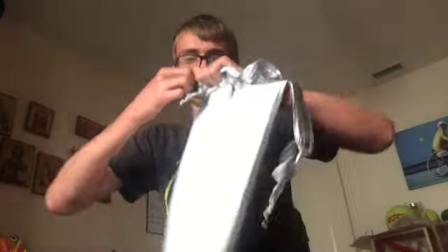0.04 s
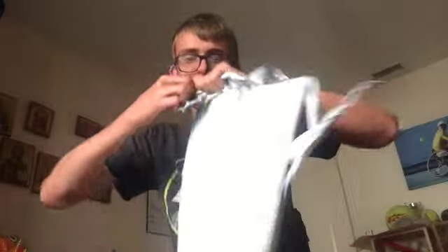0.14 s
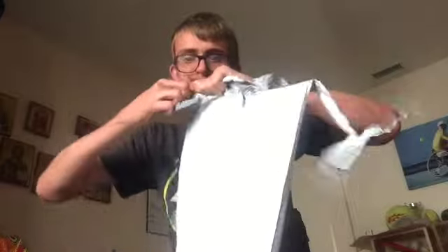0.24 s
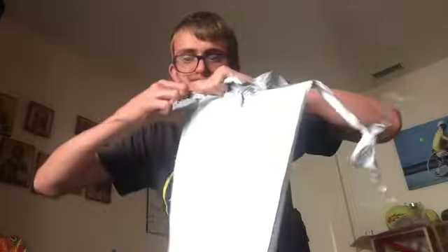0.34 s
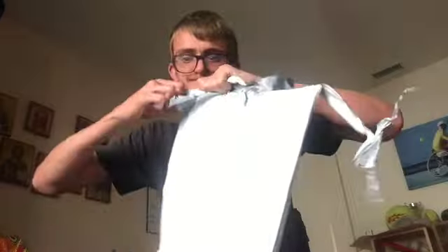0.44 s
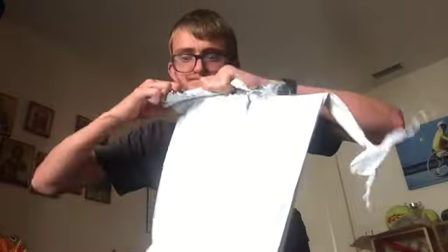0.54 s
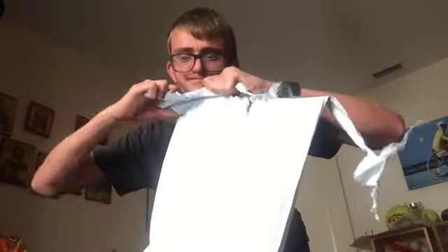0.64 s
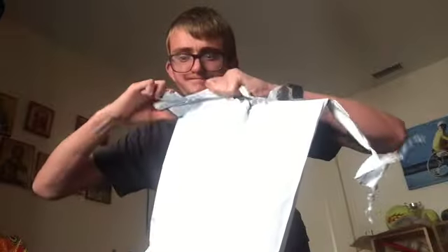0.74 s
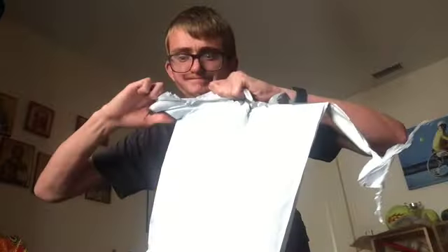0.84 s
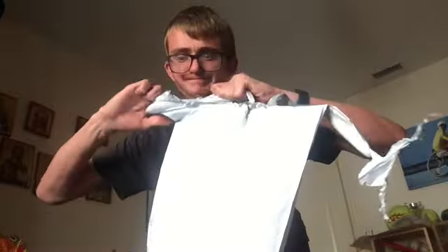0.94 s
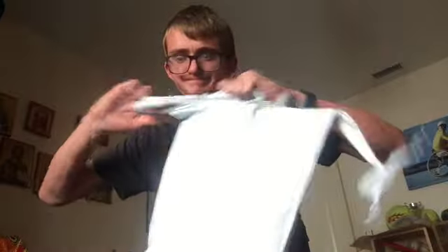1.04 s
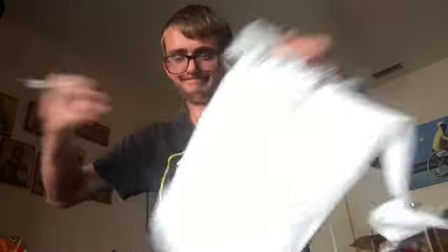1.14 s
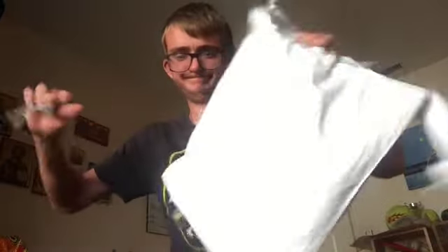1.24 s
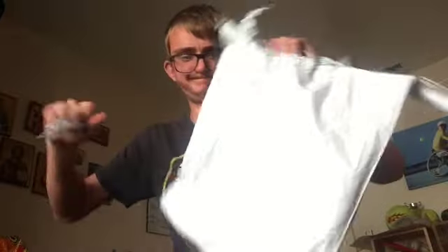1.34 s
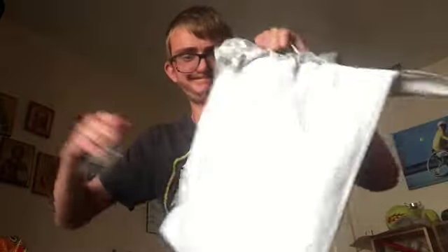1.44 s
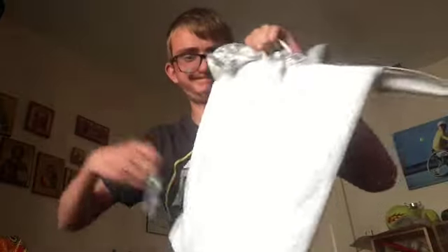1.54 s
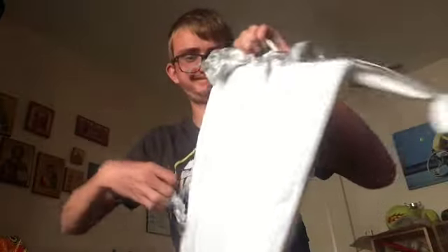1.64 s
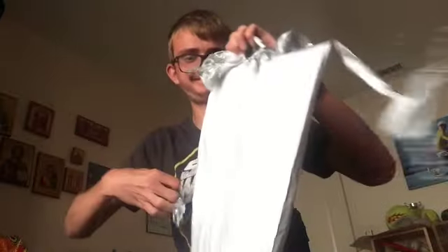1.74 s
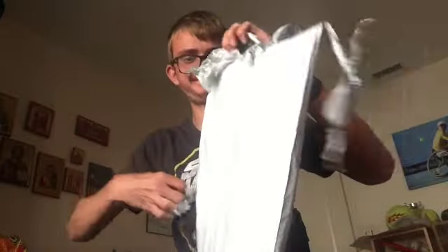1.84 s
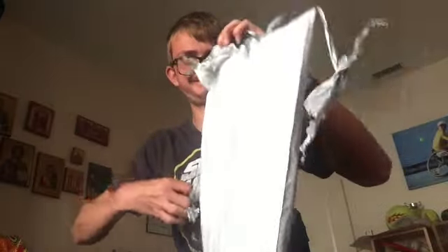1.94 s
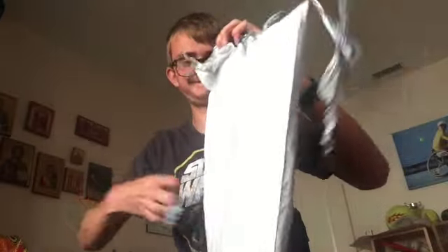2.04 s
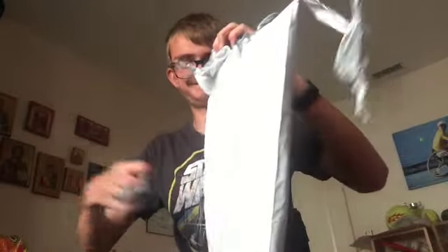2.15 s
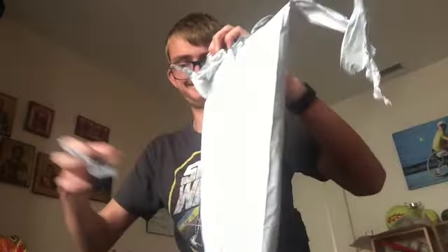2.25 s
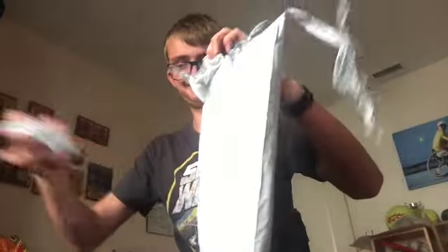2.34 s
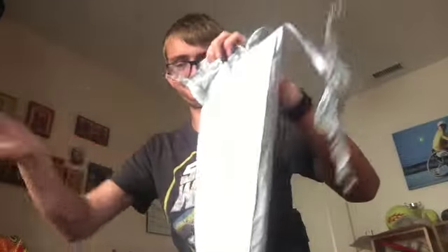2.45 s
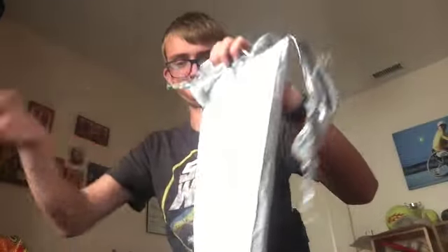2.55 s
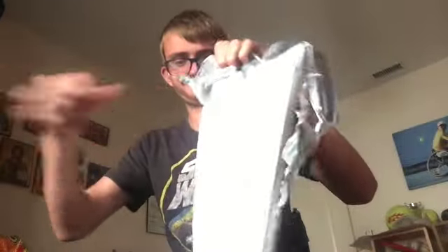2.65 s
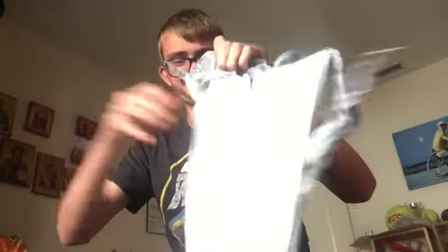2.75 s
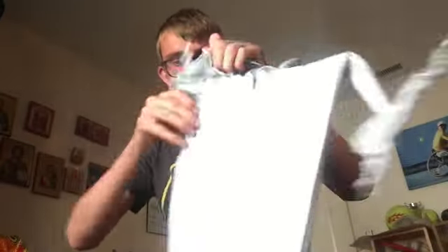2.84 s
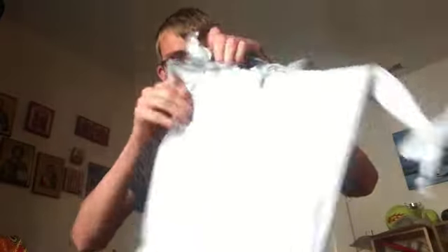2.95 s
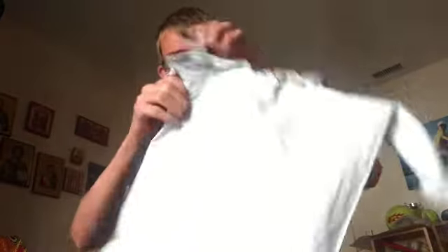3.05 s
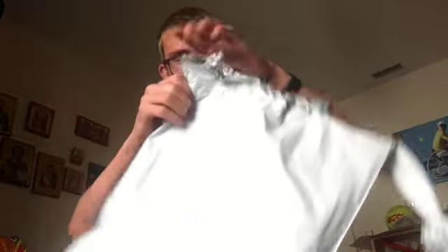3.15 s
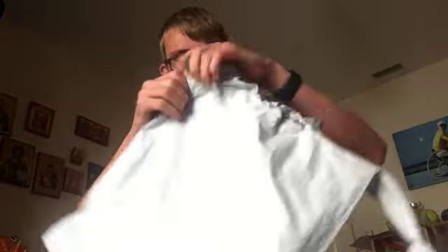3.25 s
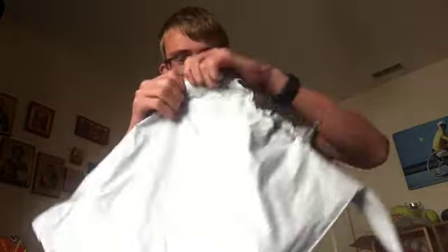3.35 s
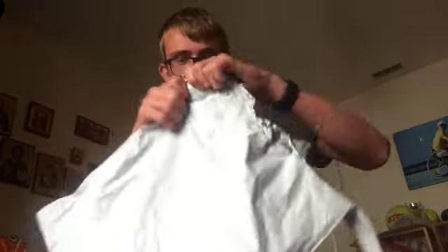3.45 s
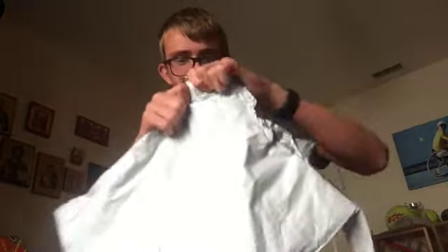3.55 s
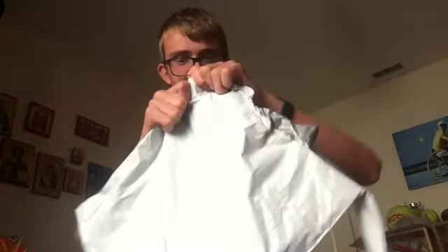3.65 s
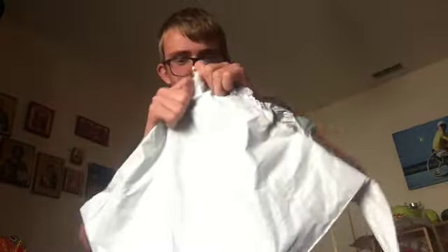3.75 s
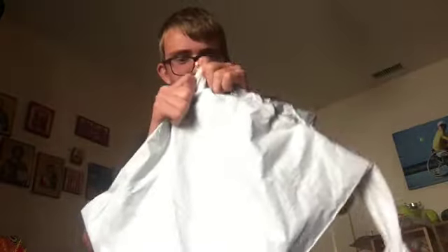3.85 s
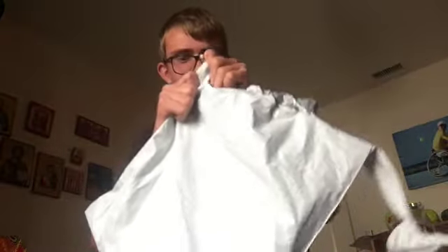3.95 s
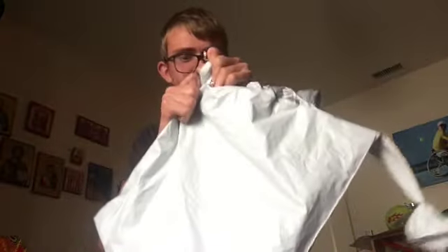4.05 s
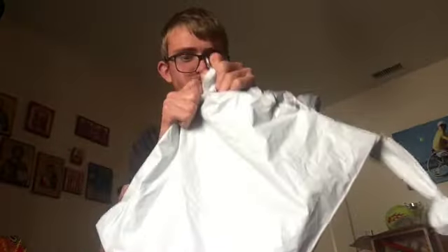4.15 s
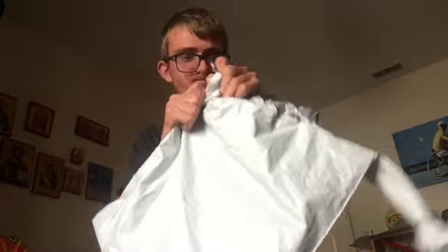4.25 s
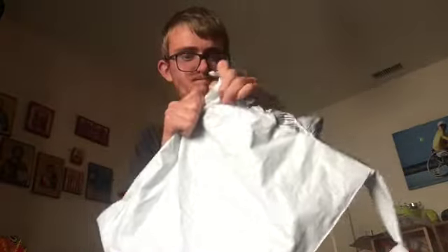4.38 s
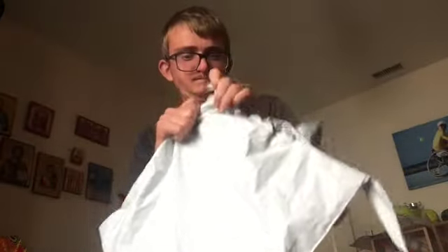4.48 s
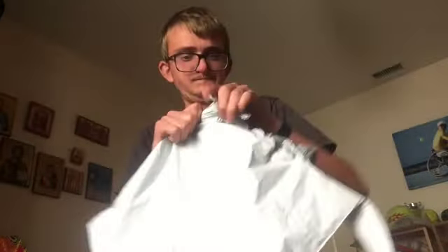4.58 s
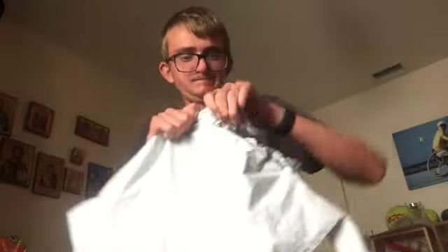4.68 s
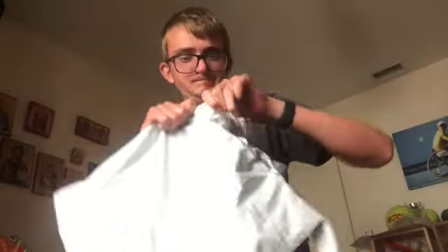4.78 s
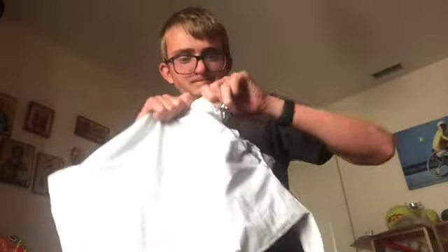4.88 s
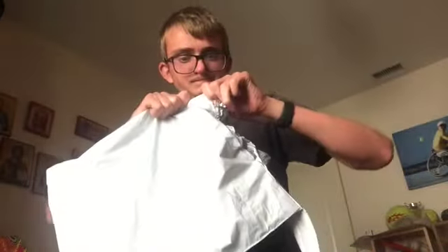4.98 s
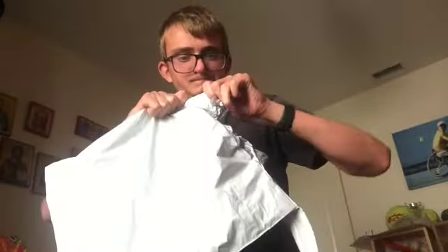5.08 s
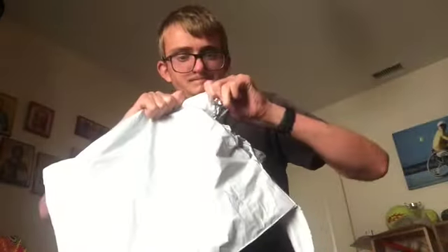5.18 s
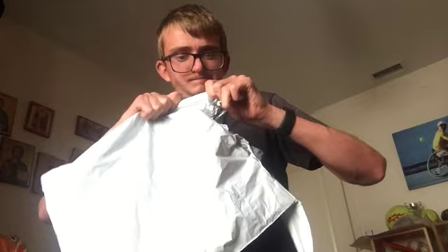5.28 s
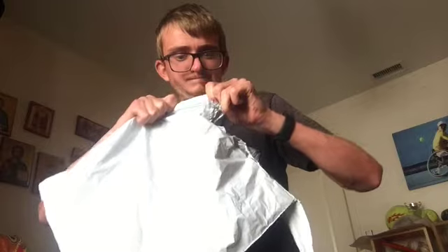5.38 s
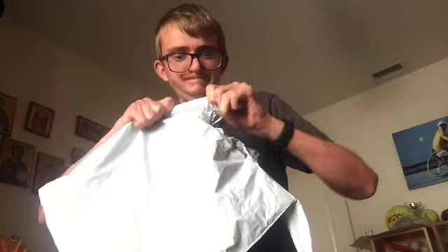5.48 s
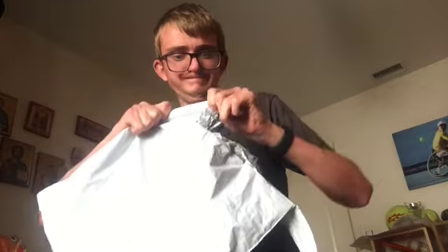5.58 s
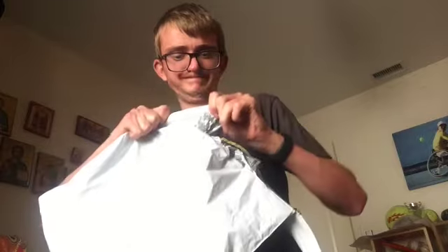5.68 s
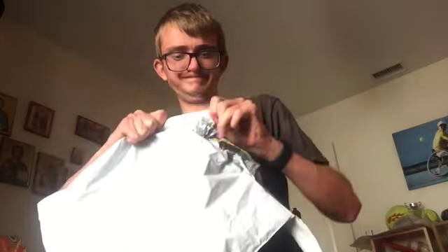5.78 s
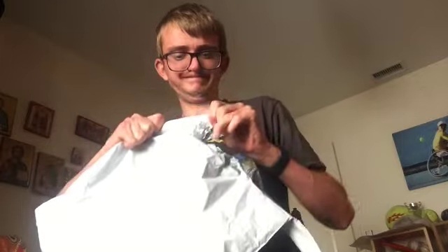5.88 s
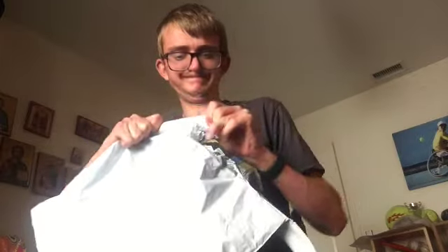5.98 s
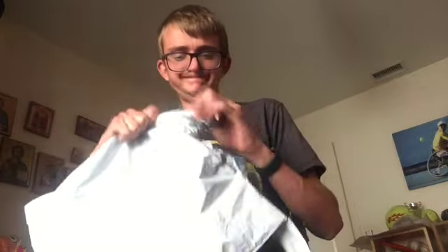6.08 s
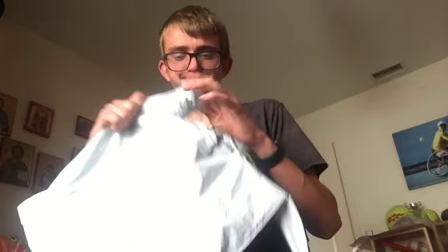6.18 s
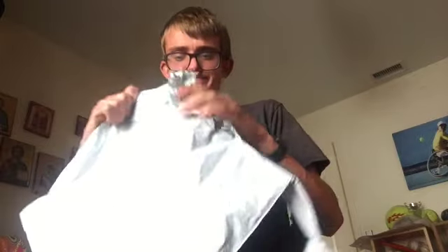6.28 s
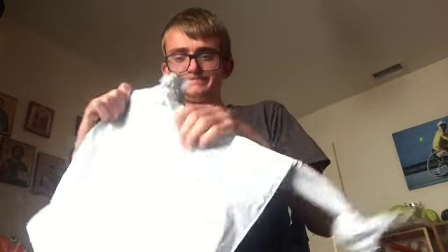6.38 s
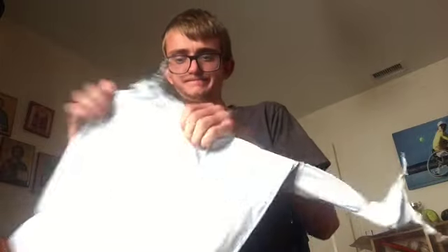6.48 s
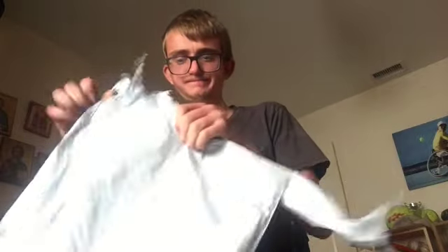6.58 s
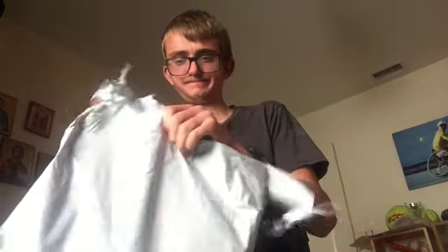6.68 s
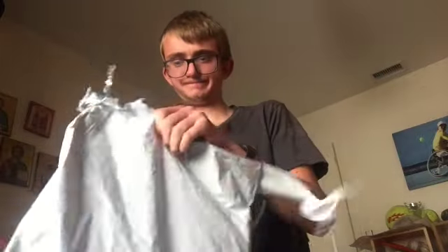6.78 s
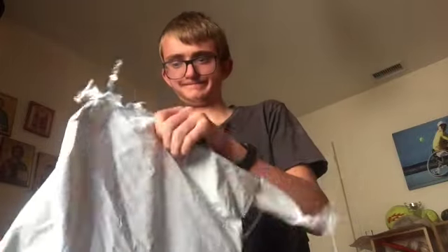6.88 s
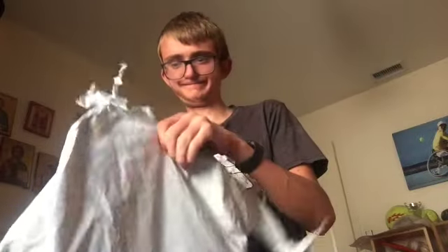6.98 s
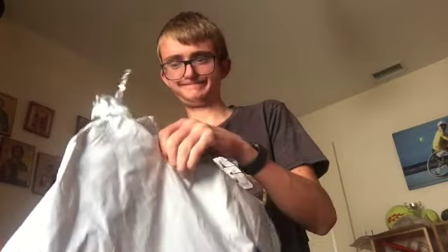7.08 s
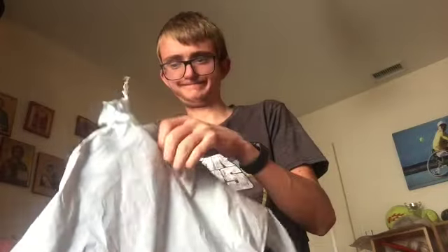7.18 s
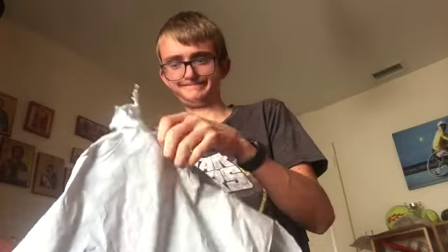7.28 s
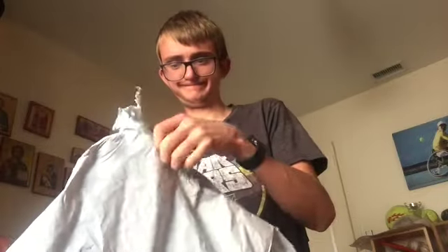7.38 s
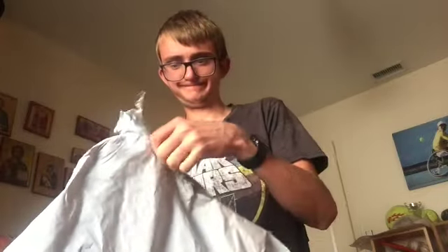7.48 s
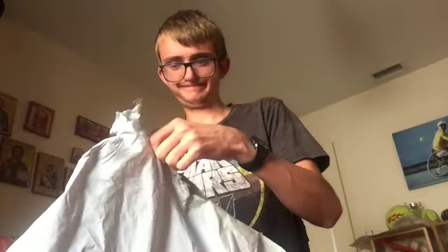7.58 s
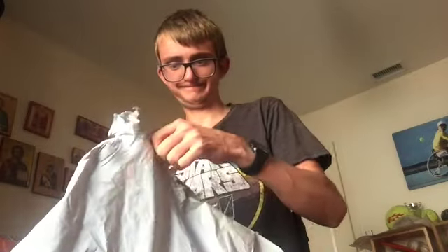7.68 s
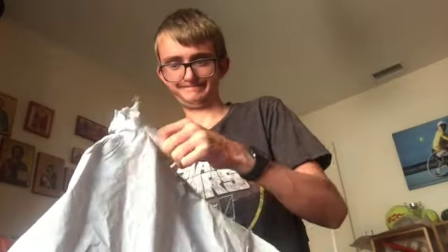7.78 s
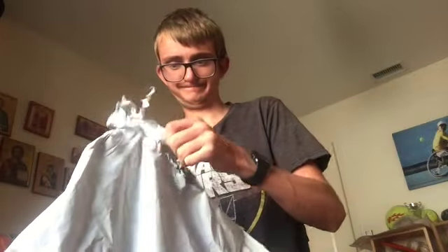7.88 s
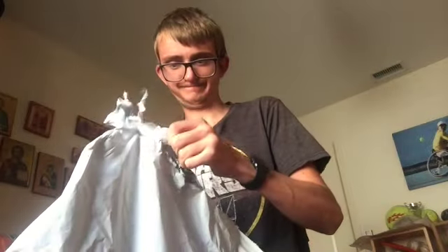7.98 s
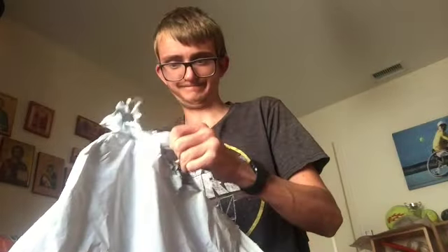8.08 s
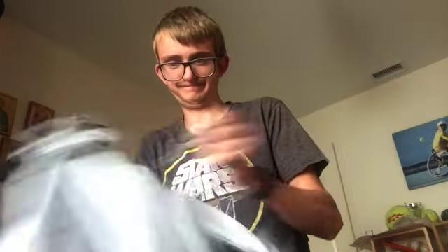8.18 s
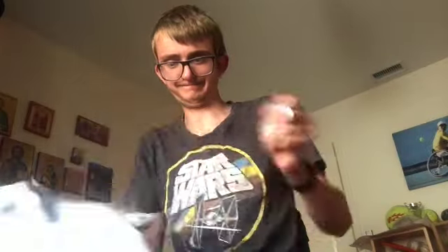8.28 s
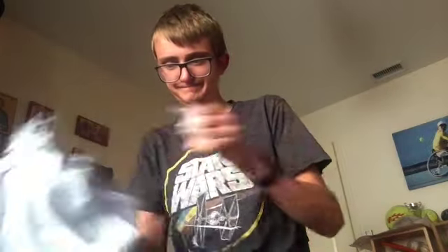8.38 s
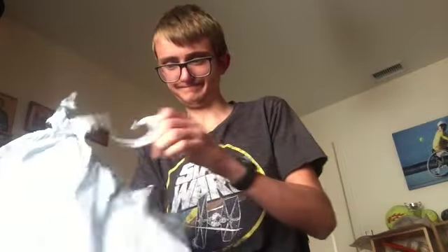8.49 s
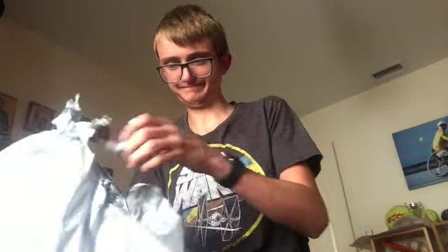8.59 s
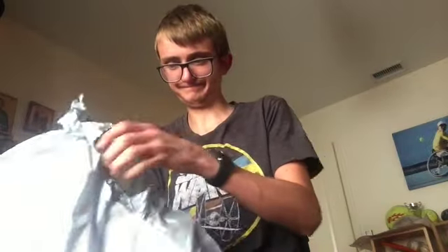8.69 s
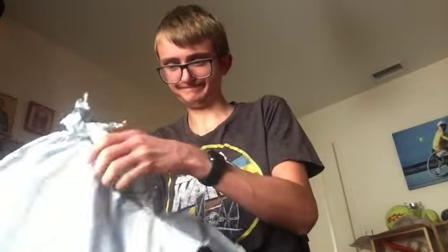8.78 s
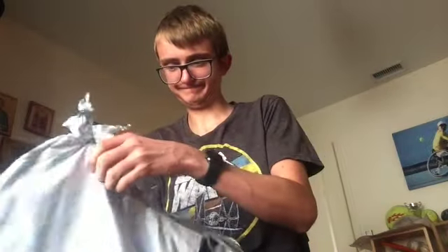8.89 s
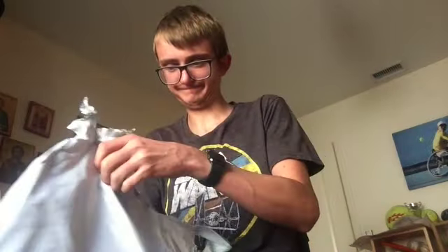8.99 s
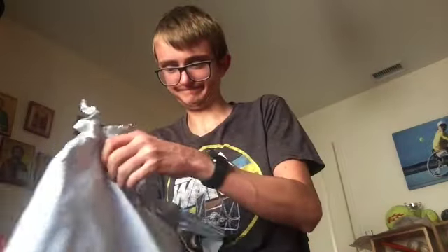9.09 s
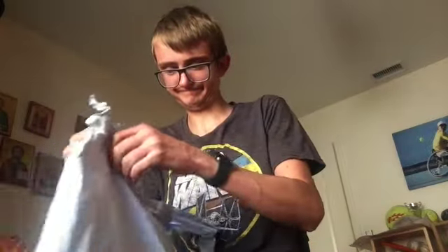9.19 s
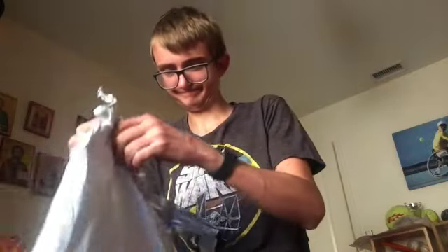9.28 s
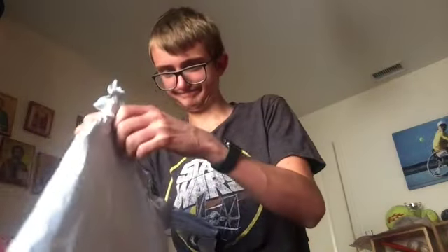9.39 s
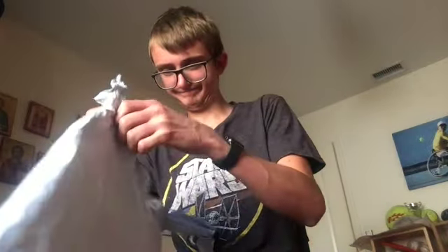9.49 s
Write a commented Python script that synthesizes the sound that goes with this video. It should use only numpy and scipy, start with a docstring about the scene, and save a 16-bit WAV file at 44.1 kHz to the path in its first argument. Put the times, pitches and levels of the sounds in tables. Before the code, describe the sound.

Close, slightly dull-topped pickup of a plastic bag being handled indoors. Light crinkles, one violent crack, then quiet with a few tiny ticks. A busy stretch of rustling and small pops fades into sparse crackles, then a vigorous shake, softer crinkling, a second violent snap with two flapping bursts, and final light ticks over faint room noise.

```python
"""A fine rustle over quiet hiss and rumble comes first, then sharp snaps, as a thin plastic mailing bag
is pulled, torn and shaken by hand in a small furnished room.
Rustle is the summed ringing of many tiny creases plus the hiss of sliding layers; each snap is three
damped tones and a tick of noise, followed by a swarm of smaller creases.
Flaps stir the bass, and the room answers a few milliseconds later by convolution with decaying noise."""
import sys
import numpy as np
from scipy import signal
from scipy.fft import rfft, irfft
from scipy.io import wavfile

SR = 44100
rng = np.random.default_rng(int(sys.argv[2]) if len(sys.argv) > 2 else 0)


def int16_out(signal):
    """Quantize to a 16-bit WAV file."""
    q = np.round(np.clip(np.atleast_2d(signal).T, -1, 1) * 32767)
    wavfile.write(sys.argv[1], SR, q.astype(np.int16))


N = 420273


def from_db(db):
    """Logarithmic level: 20 dB is a factor of ten in amplitude."""
    return 10 ** (np.asarray(db) / 20)


def rms_one(x):
    """Power normalisation: scale to unit rms."""
    return x / np.sqrt(np.mean(x ** 2) + 1e-20)


def at_hz(points, hz):
    """Logarithmic interpolation: read an (f/Hz, value) table along log frequency."""
    table_hz, values = np.transpose(points)
    return np.interp(np.log(hz), np.log(table_hz), values)


def band(x, low_hz, high_hz):
    """Band limitation: Butterworth band-pass along the last axis."""
    edges_hz = [low_hz, min(high_hz, .45 * SR)]
    return signal.sosfilt(signal.butter(2, edges_hz, "band", fs=SR, output="sos"), x)


def coloured(x, spectrum):
    """Spectral shaping: weight a flat sound by a table of spectral density, then set its rms to 1."""
    hz = np.maximum(np.arange(N // 2 + 1) * SR / N, 1)
    return rms_one(irfft(rfft(x) * from_db(at_hz(spectrum, hz)), N))


def drift(rate_hz):
    """Low-passed chance: coarse noise through a double one-pole filter, spread about 1."""
    step = 40   # samples between coarse points
    r = np.exp(-2 * np.pi * rate_hz * step / SR)
    noise = rng.standard_normal(N // step + 2002)
    slow = signal.lfilter([1], [1, -2 * r, r * r], noise)[2000:]   # drop the filter's start
    return np.interp(np.arange(N) / step, np.arange(len(slow)), rms_one(slow))


# Effort of the hands: t/s, level of the creases/dB, treble relative to that level/dB
HANDLING_CURVE = [(0, -66, 2.5), (.11, -55.5, -13), (.2, -64, -29), (.45, -68.5, 0), (.7, -73.5, -9),
                  (.93, -75.5, -12), (1.0, -42.5, -9), (1.08, -53, -1), (1.17, -52.5, -12),
                  (1.44, -58.5, -11), (1.52, -63, -5), (1.6, -59.5, -6), (1.701, -79.5, 2.5),
                  (2.08, -82.5, 2.5), (2.14, -78, 12), (2.23, -82, 7), (2.31, -80, 15.5),
                  (2.4, -82.5, -1.5), (2.722, -73.5, -9.5), (2.769, -52, -19), (2.88, -59.5, 0),
                  (2.97, -51, -16), (3.12, -75.5, -29), (3.22, -59, -2), (3.45, -57.5, -4), (3.6, -60, -11),
                  (3.7, -54.5, -2), (3.87, -63.5, -18), (4.039, -62, -12), (4.14, -75, -19.5),
                  (4.409, -62.5, -7.5), (4.77, -63.5, -13), (5.05, -69, -5), (5.31, -67, -5),
                  (5.4, -77, -12), (5.929, -78, -3), (6.03, -61.5, -1.5), (6.21, -67, -32),
                  (6.302, -53, -12), (6.39, -56.5, -6), (6.48, -47.5, -10), (6.53, -55, -15),
                  (6.58, -51, -6), (6.68, -59.5, -6), (6.95, -60, -4.5), (7.2, -68, -8.5),
                  (7.29, -79.5, -3.5), (7.62, -66, 2.5), (7.83, -61, -8), (8.06, -72.5, -4),
                  (8.12, -41, -8), (8.19, -48.5, -7), (8.3, -47.5, -8), (8.37, -54.5, -11), (8.44, -45, -7),
                  (8.68, -74.5, -45), (8.82, -60, -7), (8.93, -73.5, -3), (9.09, -67.5, -2.5),
                  (9.329, -73.5, 4.5), (9.45, -68.5, -0.5), (9.53, -64.5, 3)]


def handling(s):
    """Quasi-static driving: crease level and brightness follow the hands at given moments."""
    times, level_db, bright_db = np.transpose(HANDLING_CURVE)
    return np.interp(s, times, level_db), np.interp(s, times, bright_db)


def creases(per_s, finer_per_octave, spread_db, cycles, clump_db):
    """Crackling noise: random buckles, few large and many small, excite damped resonators.

    Each ring falls by 60 dB in the given cycles; high pitches are struck more often.
    """
    size_db = spread_db * np.minimum(rng.exponential(1, N), 4.5)
    sizes = from_db(size_db) * rng.choice([-1, 1], N)
    born = rng.random(N) < per_s * from_db(clump_db * drift(25)) / SR   # buckles come in clumps
    pitches = np.geomspace(60, 15000, 24)
    share = np.cumsum(pitches ** np.log2(finer_per_octave))
    dealt = np.searchsorted(share / share[-1], rng.random(N))   # a pitch for every buckle
    out = 0
    for k, hz in enumerate(pitches):
        r = from_db(-60 * hz / (cycles * SR))
        resonator = [1, -2 * r * np.cos(2 * np.pi * hz / SR), r * r]
        strikes = sizes * born * (dealt == k) + 1e-18
        ring = signal.lfilter([1, 0, -1], resonator, strikes)
        out = out + rms_one(ring) * np.sqrt(hz)      # equal power per Hz over all pitches
    return out


# Radiation colour of the rustling sheet: f/Hz, spectral density/dB
SHEET_COLOUR = [(18, -45), (30, -8.5), (135, -2.5), (283, -2), (332, 1), (928, -6), (1890, -3.5),
                (3480, -6.5), (4410, -6.5), (10300, -5.5), (12700, -2.5), (15200, -6.5), (16500, -34.5)]
# Edges of the four rustle registers (flap, panels, creases, fine creases): f/Hz
REGISTER_EDGES = [25, 150, 900, 5000, 18000]
SLIDING_HISS_DB = -8   # layers sliding, against the creases
PANELS_DB, FLAP_IN_PANELS_DB = -7.5, -14.5   # large panels against the creases; stirred by a flap
SWAY_DB = -81   # steady level of the hanging sheet at rest


def rustle(rows):
    """Superposition: handling, flaps and swarms drive creases and sliding hiss in four registers."""
    level_db, bright_db = handling(np.arange(N) / SR)
    flap = flaps()
    sway = flap + from_db(SWAY_DB)
    panels = from_db(level_db + PANELS_DB) + from_db(FLAP_IN_PANELS_DB) * flap
    effort = np.array([sway, panels, from_db(level_db), from_db(level_db + bright_db)]) + swarm(rows)
    grains = rms_one(creases(per_s=5000, finer_per_octave=1.5, spread_db=2.5, cycles=6.5, clump_db=3.5))
    sliding = from_db(SLIDING_HISS_DB) * rng.standard_normal(N)
    sheet = coloured(grains + sliding, SHEET_COLOUR)
    out = 0
    for k, (low_hz, high_hz) in enumerate(zip(REGISTER_EDGES, REGISTER_EDGES[1:])):
        register = rms_one(band(sheet, low_hz, high_hz))
        out = out + effort[k] * register * (-1) ** k   # neighbours agree in phase at their shared edge
    return out


# Colour of the quiet room: f/Hz, spectral density/dB
QUIET_COLOUR = [(18, -36), (30, -7), (76, 2), (163, 3), (562, 1), (953, -6.5), (4180, -13.5), (6720, -16.5),
                (13400, -12), (15200, -19.5), (16500, -36.5)]


def quiet_room():
    """Stationary background noise: coloured hiss and rumble whose level wavers slightly."""
    level_db = -78.5 + 0.84 * drift(2.4)
    return from_db(level_db) * coloured(rng.standard_normal(N), QUIET_COLOUR)


# Buckling creases: t/s, levels of crack, thump, pop, tick and following swarm/dB,
# pitches of crack, thump, pop/Hz
LISTED_SNAPS = [(0.1032, -39, -57, -48, -33.5, -51.5, 3070, 570, 2271),
                (0.1642, -41.5, -48.5, -47, -42, -58.5, 4580, 580, 2208),
                (0.327, -43.5, -72, -85, -46, -63.5, 6050, 542, 2027),
                (0.3752, -53, -71, -70, -51, -86, 4435, 670, 2020),
                (0.4194, -56, -66, -65, -51, -73, 3910, 700, 1070),
                (0.4821, -51, -57, -68, -50, -81, 4040, 390, 2290),
                (0.5897, -48.5, -52.5, -65, -82, -56.5, 2824, 696, 1927),
                (0.6788, -55, -57, -63, -56, -72, 2600, 360, 1610),
                (0.7272, -56, -68, -54, -65, -66, 2656, 800, 2290),
                (0.7865, -53, -71, -72, -52, -78, 3393, 687, 1506),
                (0.8606, -52.5, -70, -68, -67, -89, 3154, 402.4, 1240),
                (0.9133, -59, -63, -54.5, -59, -79, 5500, 522.4, 1915),
                (0.9606, -19.5, -13, -14, -20.5, -31, 4390, 566.6, 2117),
                (1.0449, -26, -29, -29, -23.5, -37.5, 6386, 420.4, 2001),
                (1.054, -32, -53, -48, -20, -72, 5720, 261, 2203),
                (1.0803, -36, -21.5, -18, -23, -39, 4920, 396.7, 1260),
                (1.324, -63, -46, -56, -43, -92, 3425, 343, 890),
                (1.5296, -43, -60, -45, -62, -67, 2620, 703, 2205),
                (1.5542, -46, -61, -47, -54, -66, 5060, 360.5, 2147),
                (1.9509, -47, -78.5, -65, -56, -64.5, 4006, 439.4, 2248),
                (2.1083, -51, -55.5, -62, -54, -59.5, 4040, 419.6, 2015),
                (2.2957, -55.5, -74, -63.5, -51.5, -72.5, 4086, 330, 1340),
                (2.5665, -63, -74.5, -75.5, -49, -87, 3950, 570, 1840),
                (2.7717, -45, -55, -54.5, -47, -66, 2860, 411, 1776),
                (2.8138, -47, -65, -43, -31.5, -57, 5780, 380, 1885),
                (2.8295, -43, -62, -46, -41, -47.5, 4750, 387.4, 2217),
                (2.8433, -42, -49, -39, -46, -54.5, 3070, 320, 2151),
                (2.9283, -33, -47, -41, -31.5, -54, 4650, 370, 1795),
                (2.9459, -35, -44, -43, -46, -56, 2930, 813, 1292),
                (2.9853, -38.5, -55, -55, -47, -54, 3850, 300.3, 1823),
                (3.1423, -44.5, -98, -54, -53, -59, 6200, 402, 1740),
                (3.2068, -47, -47.5, -40, -42, -79, 4550, 260, 1800),
                (3.2391, -42, -47, -44, -48, -53, 4450, 339, 1510),
                (3.2841, -43, -48, -44, -53, -71, 3843, 259.7, 961),
                (3.2993, -47, -57, -42.5, -58, -55, 4990, 412, 1497),
                (3.3391, -40.5, -65, -61, -55, -72, 2936, 389.7, 1130),
                (3.3573, -48, -63, -55, -57, -79, 4680, 360, 2072),
                (3.3868, -40, -49, -46, -64, -52.5, 4900, 339.4, 1338),
                (3.4021, -48, -55, -44, -59, -65, 4715, 420, 1930),
                (3.5117, -36, -43.5, -53, -40.5, -53, 2940, 373, 2290),
                (3.5491, -45, -56, -50, -52, -71, 4510, 840, 2303),
                (3.5667, -39, -57, -47, -43, -55, 4490, 787, 952),
                (3.5837, -50, -47.5, -47, -58, -64, 4140, 381, 906),
                (3.6384, -45, -63, -49, -39.5, -71, 4086, 401, 971),
                (3.649, -46, -62, -37, -59, -80, 2756, 570, 1586),
                (3.6733, -54, -70, -41, -64, -67, 4330, 430, 1962),
                (3.6925, -38, -66, -41, -40, -57, 4950, 419.7, 1667),
                (3.7101, -36.5, -39, -42, -47, -48, 4710, 900, 1700),
                (3.7256, -53, -54, -49, -39, -67, 3790, 860, 1554),
                (3.9172, -40, -46.5, -43, -39, -52.5, 4110, 729, 2280),
                (3.9241, -55, -69, -78, -42, -63, 5650, 635, 1945),
                (3.9839, -45, -74, -49, -47.5, -65, 3995, 570, 1480),
                (4.2246, -52.5, -81, -50.5, -76, -66.5, 2920, 529, 1682),
                (4.4004, -44.5, -49.5, -56, -73, -75, 4350, 289.7, 1862),
                (4.4613, -45.5, -52, -62, -48, -77, 4570, 310, 2260),
                (4.4681, -63, -65, -67, -41, -70, 4290, 362.5, 1675),
                (4.5454, -51, -66, -48, -53, -92, 3170, 381.3, 1260),
                (4.5983, -43, -50, -47, -64, -66, 2866, 590, 2265),
                (4.6534, -52, -63, -53, -46, -63, 3766, 620, 2290),
                (4.6608, -47, -64, -63.5, -38, -71, 2664, 367, 2266),
                (4.7425, -42.5, -48, -51, -63, -62, 2607, 742, 1836),
                (4.7741, -44.5, -45, -53, -47, -64, 2740, 687, 1547),
                (4.7794, -55, -39.5, -50, -61, -82, 2773, 580, 1138),
                (4.8734, -39.5, -42.5, -42.5, -79, -60, 2680, 590, 2207),
                (4.9486, -47, -41.5, -58, -61, -58.5, 3065, 392.4, 1570),
                (4.9965, -47, -65, -51, -47, -66, 4230, 690, 2296),
                (5.0188, -45, -81, -71, -52, -74, 4610, 711, 2158),
                (5.1069, -52, -70, -50, -73, -78, 4880, 320, 1820),
                (5.1154, -48.5, -54, -58, -71, -76, 3080, 361, 1804),
                (5.1808, -52, -80, -71, -52, -57.5, 2970, 759, 900),
                (5.2058, -46, -61, -48.5, -55, -74, 3090, 716, 1946),
                (5.2528, -42.5, -42.5, -39, -53, -52.5, 2660, 768, 2227),
                (5.3059, -52, -57.5, -76, -58, -87, 4480, 431, 1547),
                (5.4193, -49.5, -50.5, -46.5, -72.5, -63.5, 2937, 711, 1902),
                (5.5044, -54.5, -60.5, -69, -83, -72, 4490, 369.7, 2194),
                (5.5461, -49.5, -54.5, -46, -75, -63, 3020, 610, 1592),
                (5.7272, -50, -69.5, -58.5, -72.5, -59, 5320, 320, 1930),
                (5.9933, -49.5, -44.5, -42, -74.5, -49, 5060, 820, 2225),
                (6.0872, -51, -71, -51, -48, -66, 4140, 339.7, 2298),
                (6.1089, -55, -56, -49, -46, -66, 3884, 390, 1487),
                (6.1632, -42, -50, -56, -74, -58, 2960, 608, 2290),
                (6.2085, -57, -48, -53, -85, -59, 3526, 700, 1260),
                (6.293, -39, -42.5, -37, -63, -54.5, 3404, 367.7, 1998),
                (6.3294, -52, -41.5, -43, -51, -51.5, 2646, 400, 1800),
                (6.3586, -47, -39, -39, -39.5, -60, 5050, 366.4, 1933),
                (6.4226, -42, -53, -38, -53, -42, 3523, 805, 2224),
                (6.443, -39, -40, -48, -50, -55, 2863, 340, 1180),
                (6.5411, -46, -47, -42, -70, -76, 2610, 260, 2290),
                (6.6468, -42, -64, -42.5, -45, -56, 2630, 541, 2091),
                (6.8104, -47, -60, -64, -65, -92, 4260, 280, 1830),
                (6.9158, -41.5, -56, -51, -64, -70, 3106, 380.6, 1018),
                (6.972, -52, -56, -88, -46, -62, 5620, 398.7, 1576),
                (7.2077, -53, -55, -49.5, -70.5, -74, 3420, 431.6, 1484),
                (7.3867, -48, -64.5, -64.5, -57, -65, 4500, 478, 1680),
                (7.6719, -45, -67, -60, -45, -68, 3206, 280, 1213),
                (7.739, -49, -68, -48, -67, -73, 2607, 810, 1560),
                (7.7848, -43, -77, -50, -50, -56, 2765, 590, 1870),
                (7.8153, -34, -73, -56, -45, -55, 3090, 298.5, 1776),
                (7.8749, -45, -71, -59, -82, -51, 2868, 888, 1045),
                (7.9483, -49, -70, -67, -65, -61, 2858, 267.7, 1457),
                (7.9628, -46, -51, -51, -49, -65, 4100, 383, 2280),
                (8.0357, -40, -51, -50, -61, -53, 4460, 388, 1777),
                (8.0453, -39, -49, -44, -44, -52.5, 6210, 561, 1946),
                (8.0842, -40, -53, -47, -51, -53, 3196, 880, 900),
                (8.0992, -19.5, -25.5, -16, -21, -33, 3160, 520, 1620),
                (8.1245, -46, -34, -46, -34, -57, 5175, 383, 1850),
                (8.2934, -42, -56, -52, -33, -62, 4340, 760, 1161),
                (8.8028, -51.5, -50.5, -53, -34.5, -72, 4730, 297.3, 2212),
                (8.9658, -53, -50, -50, -44, -71, 3090, 706, 1001),
                (9.0047, -53, -61, -52, -73, -77, 2870, 610, 1500),
                (9.0702, -51, -60, -53, -44, -58, 4620, 326.5, 900),
                (9.2064, -48.5, -71, -52.5, -53, -74, 4510, 263.3, 1740),
                (9.3582, -39, -64, -55, -51, -80, 4944, 560, 1570),
                (9.518, -48, -53, -62, -41, -57, 5400, 758, 2086)]
# Pitch range of lesser snaps, one row each for crack, thump, pop: lowest f/Hz, highest f/Hz
SMALL_PITCHES = [(2500, 5800), (280, 850), (900, 2500)]
SMALL_SNAPS = 230   # lesser creases that buckle at random moments
SMALL_SNAP_DB = [13, 3, 10, 11, -10]   # highest crack, thump, pop, tick, swarm against the handling
SMALL_SPREAD_DB = 16   # chance lowers each level by up to this


def all_snaps():
    """Random event process: listed snaps joined by lesser ones whose levels follow the handling."""
    chance = rng.random((SMALL_SNAPS, 9))
    s = chance[:, 0] * (N - 1) / SR
    level_db, bright_db = handling(s)
    db = level_db[:, None] + SMALL_SNAP_DB - SMALL_SPREAD_DB * chance[:, 1:6]
    db[:, 3] += bright_db   # only the tick follows brightness
    low_hz, high_hz = np.transpose(SMALL_PITCHES)
    pitches = low_hz * (high_hz / low_hz) ** chance[:, 6:]
    return np.vstack([LISTED_SNAPS, np.column_stack([s, db, pitches])])


# Ringing parts of a snap (crack, thump, pop); wide panels move later and longer:
# delay t/s, rise time constant t/s, 60 dB decay t/s, roughness [ratio]
RINGING_PARTS = [(.0001, .00015, .0035, .5), (.001, .0008, .012, .2), (.0003, .0003, .005, .35)]
TICK_T60_S = .0032
SAG = .3   # a ring starts half of this fraction sharp and ends as flat when the film slackens


def snaps(rows):
    """Damped free vibration: a buckle rings at three falling pitches and starts with a noisy tick."""
    age = np.arange(2048) / SR
    noise = rng.standard_normal((len(rows), 4, len(age)))
    parts = []
    for k, (delay, rise, t60, rough) in enumerate(RINGING_PARTS):
        hz = rows[:, 6 + k:7 + k]
        late = np.maximum(age - delay, 0)
        shape = (1 - np.exp(-late / rise)) * from_db(-60 * late / t60)
        slack = t60 / 5   # time constant of the pitch fall
        hurried = (1 - SAG / 2) * late + SAG * slack * (1 - np.exp(-late / slack))
        polarity = np.sign(noise[:, k, :1])
        tone = polarity * np.sin(2 * np.pi * hz * hurried)
        wobble = rms_one(band(noise[:, k], 16, 1.2 * np.mean(hz)))    # the film deforms while it rings
        parts.append(band(shape * tone * (1 + rough * wobble), 180, 18000))   # small patches radiate no bass
    parts.append(band(noise[:, 3] * from_db(-60 * age / TICK_T60_S), 8100, 14000))
    out = np.zeros(N + len(age))
    for k, bursts in enumerate(parts):
        # a level counts the whole burst's energy as if spread over 40 samples
        size = np.sqrt((bursts ** 2).sum(1, keepdims=True) / 40)
        bursts = bursts * from_db(rows[:, 1 + k:2 + k]) / size
        for s, burst in zip(rows[:, 0], bursts):
            start = round(s * SR)
            out[start:start + len(age)] += burst
    return out[:N]


# Share of a swarm in each rustle register, low to high: level/dB
SWARM_SHARE = [-15.5, -5.5, 2.5, 8.5]
SWARM_RISE_S, SWARM_T60_S = .005, 0.064   # rise time constant; 60 dB decay
SWARM_LIKE_SNAP = 0.52   # fraction of the snap's colour, in dB, that its swarm takes on


def swarm(rows):
    """Avalanche relaxation: each snap sets off small creases whose level rises and dies exponentially."""
    kicks = np.zeros((4, N))
    for s, crack_db, thump_db, pop_db, tick_db, swarm_db, *pitches in rows:
        middle_db = max(crack_db, pop_db)
        colour_db = np.array([thump_db, thump_db, middle_db, tick_db]) - middle_db
        kicks[:, round(s * SR)] += from_db(swarm_db + SWARM_LIKE_SNAP * colour_db + SWARM_SHARE)
    rise = np.exp(-1 / (SWARM_RISE_S * SR))
    dying = signal.lfilter([1], [1, -from_db(-60 / (SWARM_T60_S * SR))], kicks)
    return signal.lfilter([1 - rise], [1, -rise], dying)


# Decay of the room's late tail: f/Hz, 60 dB decay t/s
ROOM_DECAY = [(100, 0.71), (1000, 0.31), (4000, 0.24), (14000, 0.75)]
FIRST_ECHO_S = .0045   # gap before the tail, which then takes as long again to reach full strength
ROOM_DB, EARLY_DB, EARLY_BOOST_T60_S = -10.5, 6.5, 0.12   # tail energy; early boost and its own decay
WALL_ECHO_S, WALL_ECHO_DB = 0.0086, -20.5   # one near surface answers clearly


def room(x):
    """Reverberation by convolution: a clear echo and strong early reflections lead into a dense tail.

    The late tail dies fastest in the middle treble and lasts longer at both ends.
    """
    age = np.arange(SR // 2) / SR
    edges_hz, tail = 40 * 2.0 ** np.arange(10), 0
    for low_hz, high_hz in zip(edges_hz, edges_hz[1:]):
        t60 = at_hz(ROOM_DECAY, np.sqrt(low_hz * high_hz))
        tail = tail + band(rng.standard_normal(len(age)), low_hz, high_hz) * from_db(-60 * age / t60)
    rise = np.clip(age / FIRST_ECHO_S - 1, 0, 1)
    tail = tail * rise * (1 + from_db(EARLY_DB - 60 * age / EARLY_BOOST_T60_S))
    tail = from_db(ROOM_DB) * tail / np.sqrt(np.sum(tail ** 2))
    spread = np.exp(-((age - WALL_ECHO_S) / 0.00052) ** 2)   # the surface is uneven
    scattered = spread * rng.standard_normal(len(age))
    tail = tail + from_db(WALL_ECHO_DB) * scattered / np.sqrt(np.sum(scattered ** 2))
    return signal.fftconvolve(x, tail)[:N]


# Flaps of the whole sheet: middle t/s, length t/s, peak level/dB
SHEET_FLAPS = [(1.094, 0.39, -61), (2.8, 0.16, -66.5), (2.938, 0.16, -58.5), (4.05, 0.11, -84),
               (6.326, 0.21, -67), (6.52, 0.36, -58), (6.82, 0.21, -75), (8.17, 0.43, -62),
               (8.438, 0.15, -56.5)]


def flaps():
    """Amplitude envelope: each flap of the sheet swells and fades as a squared cosine."""
    t = np.arange(N) / SR
    level = 0
    for s, length, db in SHEET_FLAPS:
        phase = np.pi * np.clip((t - s) / length, -.5, .5)
        level = level + from_db(db) * np.cos(phase) ** 2
    return level


def scene():
    """Linear superposition: the bag, the room's answer and the quiet background."""
    rows = all_snaps()
    bag = snaps(rows) + rustle(rows)
    return (bag + room(bag) + quiet_room())[None]


def record(dry):
    """Low-pass limitation: the top is cut steeply, 60 dB down from 16.7 kHz."""
    return signal.sosfilt(signal.cheby2(14, 60, 16700, fs=SR, output="sos"), dry)


dry = scene()
out = record(dry)
int16_out(out)
```